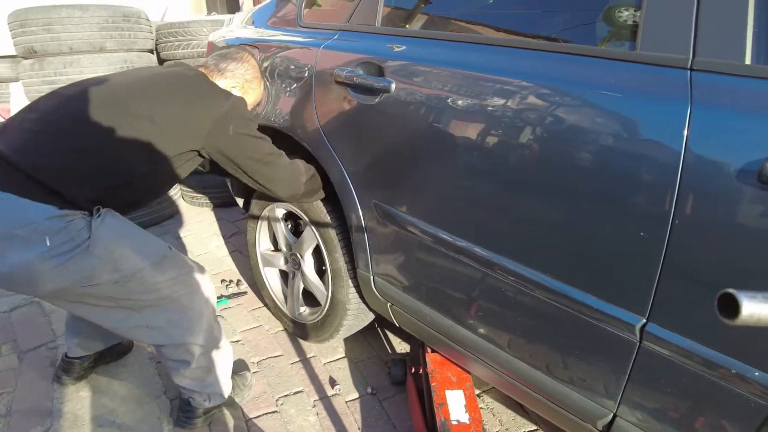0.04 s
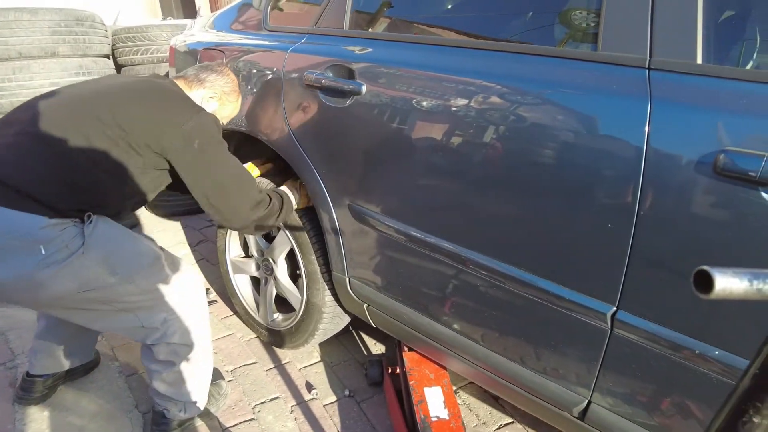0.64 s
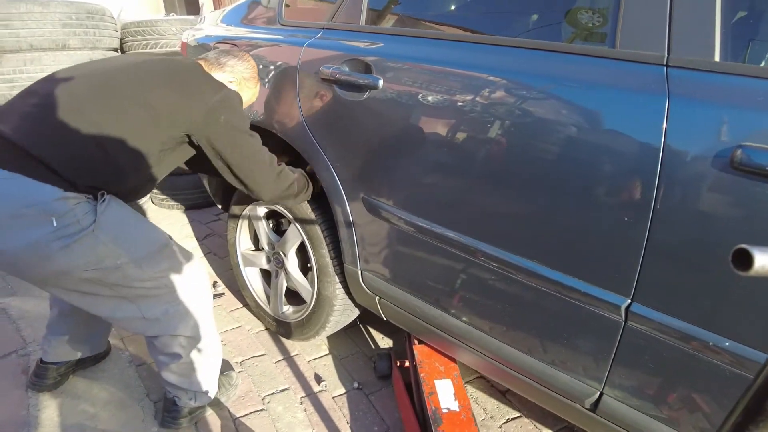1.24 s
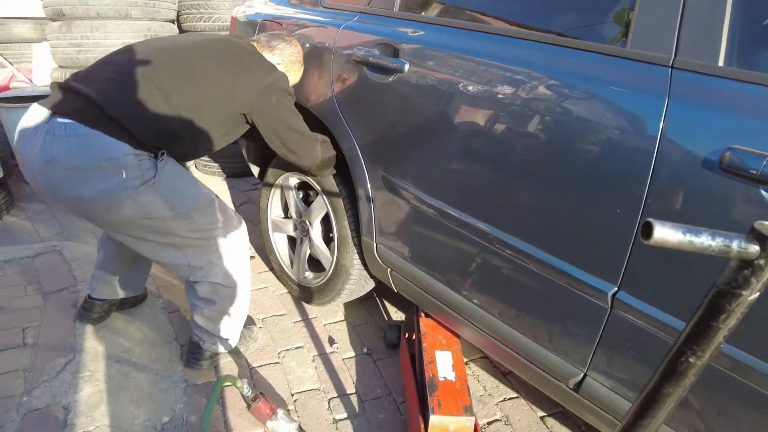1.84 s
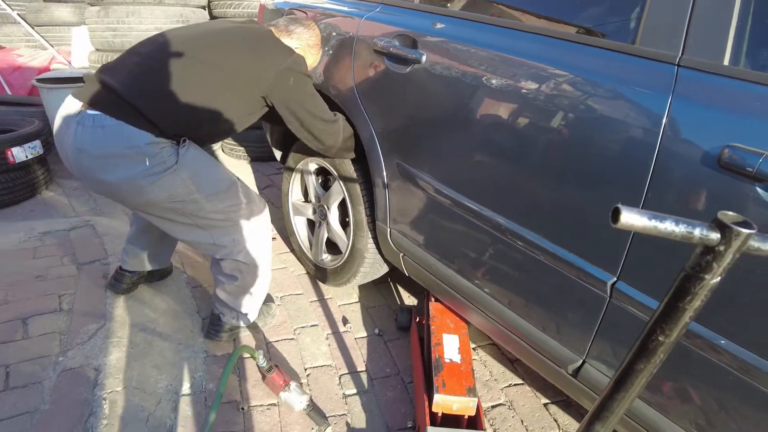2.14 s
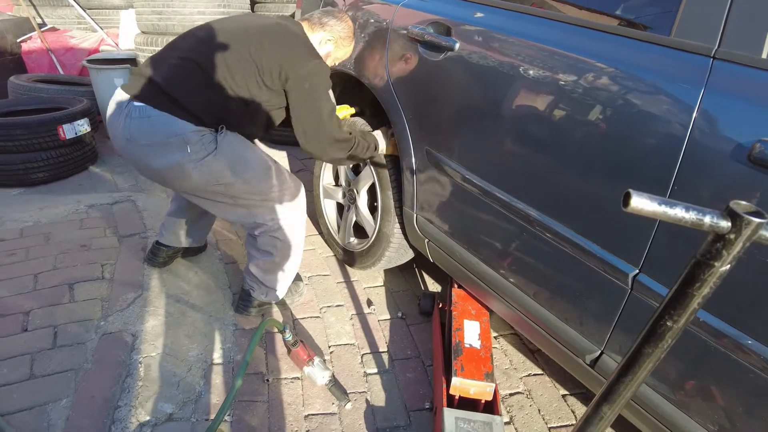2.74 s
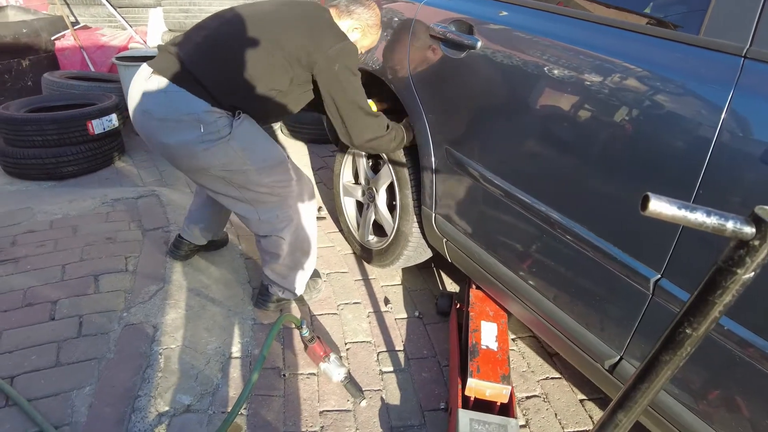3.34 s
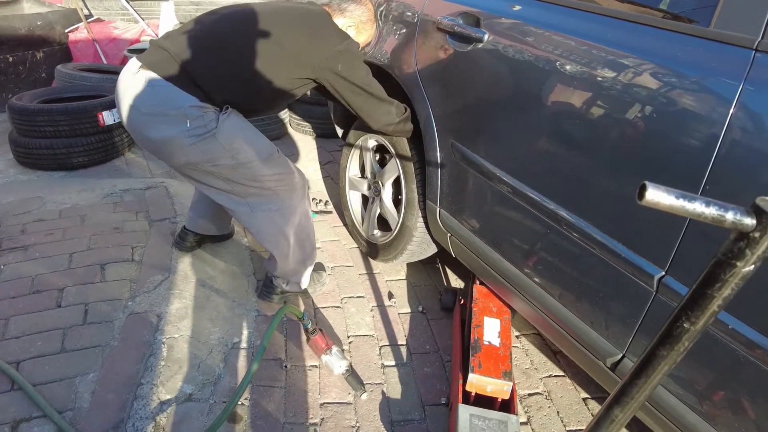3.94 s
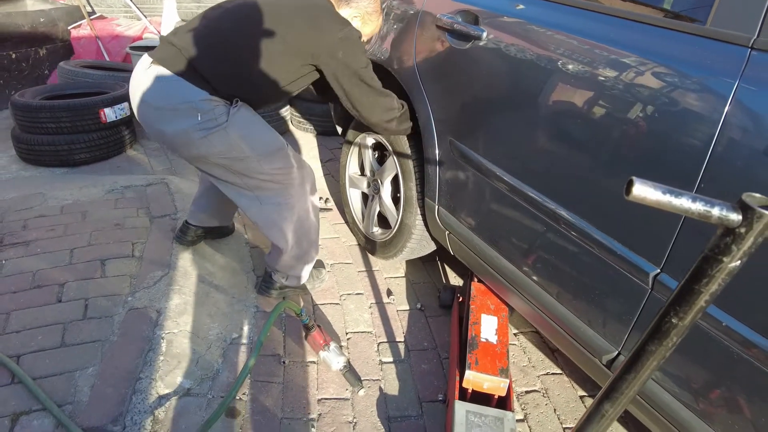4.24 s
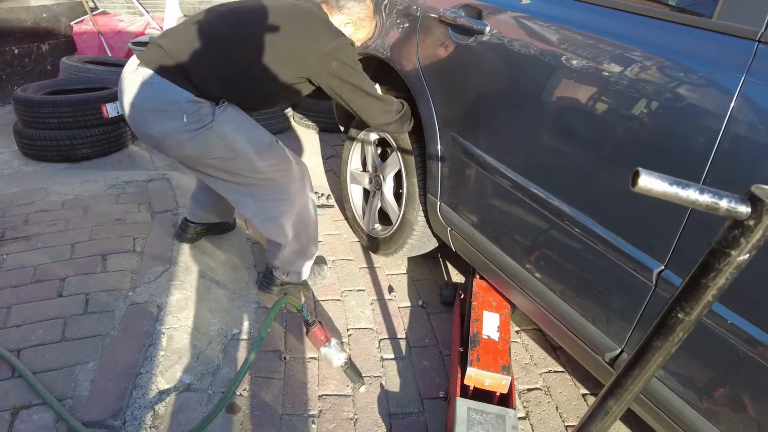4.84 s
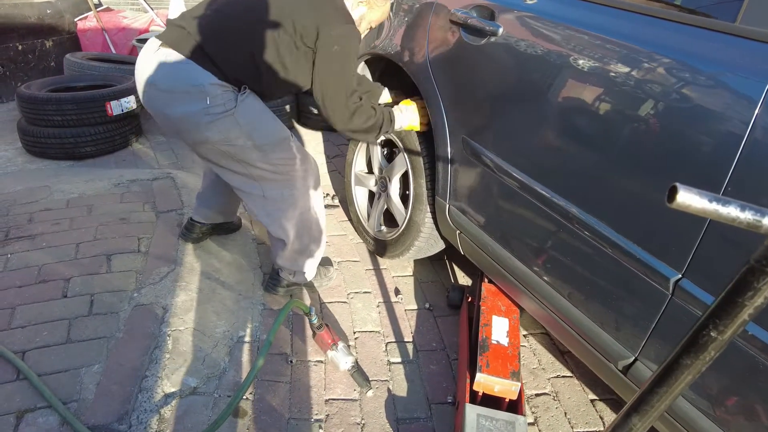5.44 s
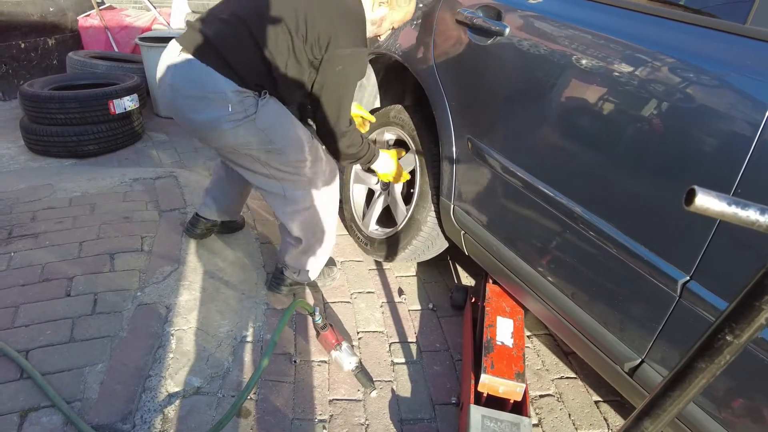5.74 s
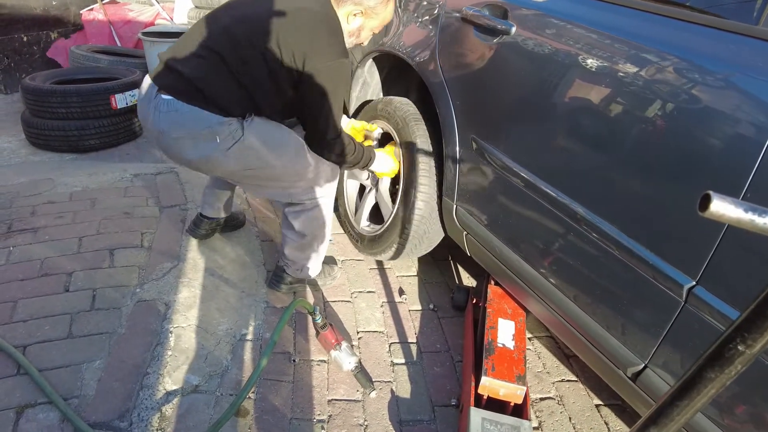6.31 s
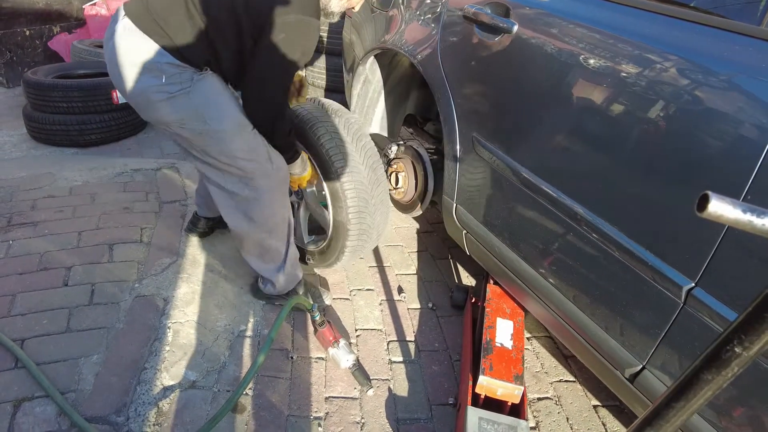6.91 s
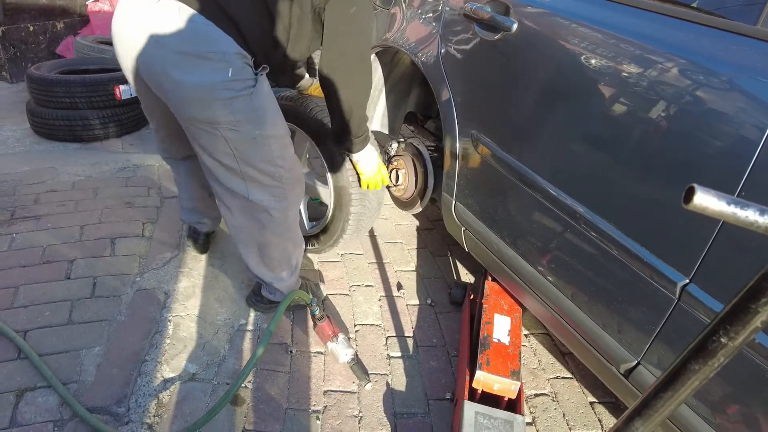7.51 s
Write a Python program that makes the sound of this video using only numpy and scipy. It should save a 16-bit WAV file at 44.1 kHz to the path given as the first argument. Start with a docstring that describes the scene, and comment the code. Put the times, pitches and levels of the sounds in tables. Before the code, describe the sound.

A stuck car wheel is rocked on its hub outdoors, over a faint low wash and soft hiss. From the start, softer dull knocks alternate with hard metallic ones, about half a second apart. The hard knocks, near 0.7, 1.6, 2.7, 3.7 and 4.7 seconds, each come with a short gritty scrape, a rattle and a low tyre thump. From about 2.7 seconds wind rumbles on the microphone, strongest around 4 seconds. The metal gives one faint squeak at 3.3 seconds, and at 3.7 the brake disc rings thin and high. At about 5.1 seconds a quick cluster of knocks and a scrape frees the rim, which rings briefly. The wind dies down by 6 seconds. Faint scuffs and soft tyre bumps follow until about 7.2 seconds as the wheel is lifted away, and a last gust rises near 7.4 seconds.

```python
"""A stuck car wheel is rocked off its hub by hand, on a paved yard with a low wash and a soft hiss.
From the start, pushes and pulls alternate: a push seats the rim with a dull knock; on a pull it
scrapes over the rusty hub, knocks hard and chatters. From about 2.7 s wind rumbles on the microphone.
The loaded metal squeaks once, then a hard scrape sets the brake disc singing. At 5.1 s the rim slips
free and rings. The wind drops, the wheel is lifted away with scuffs and bumps, and a last gust rises."""
import sys
import numpy as np
from scipy import signal
from scipy.fft import rfft, irfft
from scipy.io import wavfile
from scipy.ndimage import uniform_filter1d

SR = 44100
rng = np.random.default_rng(int(sys.argv[2]) if len(sys.argv) > 2 else 0)


def wav_record(signal):
    """Record a signal, one row per channel, as 16-bit PCM in the file named by sys.argv[1]."""
    frames = np.transpose(np.atleast_2d(signal))
    bounded = np.clip(frames, -1, 1)
    # unit amplitude maps onto the largest positive 16-bit level
    quanta = np.round(bounded * 32767).astype(np.int16)
    wavfile.write(sys.argv[1], SR, quanta)


N = 333816
T = np.arange(int(0.8 * SR)) / SR  # time axis of one event [s]


def amp(db):
    """Decibels to gain."""
    return 10 ** (np.asarray(db) / 20)


def at_hz(points, hz):
    """Interpolates (frequency, value) points on a log-frequency axis."""
    freqs, values = np.transpose(points)
    return np.interp(np.log(hz + 1), np.log(freqs + 1), values)


def level_db(curve):
    """Interpolates (time, level) points per sample."""
    return np.interp(np.arange(N) / SR, *np.transpose(curve))


def add(mix, start_s, sound):
    """Mixes a sound in at start_s."""
    part = mix[max(round(start_s * SR), 0):][:len(sound)]
    part += sound[:len(part)]


def colour(x, gain_db):
    """Filters by a dB function of frequency, to rms 1."""
    y = irfft(rfft(x) * amp(gain_db(np.fft.rfftfreq(len(x), 1 / SR))), len(x))
    return y / np.sqrt(np.mean(y ** 2) + 1e-20)


def noise(spectrum, size=len(T)):
    """Noise of rms 1, shaped by (frequency [Hz], level [dB]) points."""
    return colour(rng.standard_normal(size), lambda hz: at_hz(spectrum, hz))


def steadied(x, window_s):
    """Divides out the running rms."""
    return x / np.sqrt(abs(uniform_filter1d(x ** 2, int(window_s * SR))) + 1e-6)


def decayed(x, t60_curve):
    """Decays each band at its own T60."""
    hz, t, bands = signal.stft(x, SR, nperseg=256)
    decay = amp(-60 * t / at_hz(t60_curve, hz)[:, None])
    return signal.istft(bands * decay, SR, nperseg=256)[1][:len(x)]


def ring(modes, scatter_db=0):
    """Decaying sines of a struck body, with optional random mode levels."""
    hz, db, t60_s = np.transpose(modes)[:, :, None]
    gains = amp(db + scatter_db * rng.standard_normal(db.shape))
    return (gains * amp(-60 * T / t60_s) * np.sin(2 * np.pi * hz * T)).sum(0)


def burst(hz, peak_s, shape=2):
    """A few cycles that swell and die."""
    return (T / peak_s * np.exp(1 - T / peak_s)) ** shape * np.sin(2 * np.pi * hz * T)


def rise(rise_s):
    """Exponential attack."""
    return 1 - np.exp(-T / rise_s)


def stroke(length_s, rise_s, fall_s):
    """Pressure of a rub: rise, hold, release."""
    return rise(rise_s) * np.exp(-np.maximum(T - length_s, 0) / fall_s)


def stick_slip(slips_per_s, smooth):
    """Uneven clicks over smooth friction."""
    return rng.standard_normal(len(T)) * (smooth + (rng.random(len(T)) < slips_per_s / SR))


# Ambient spectra (frequency [Hz], relative level [dB])
WASH_SPECTRUM = [(40, 13.5), (100, 5.5), (200, 0), (300, -5.5), (600, -6.5), (1000, -9.5), (1500, -20),
                 (3000, -24.5), (6000, -77.5)]
HISS_SPECTRUM = [(500, 13.5), (1800, 0.5), (3000, 2.5), (5000, 4.5), (7000, 2), (8500, -5.5),
                 (10500, -14.5), (15500, -34)]
# Ambient drift (time [s], relative level [dB])
WASH_DRIFT = [(0.0, -48), (5.6, -48), (6.5, -48), (7.3, -50), (7.57, -51)]
HISS_DRIFT = [(0.0, -62), (0.42, -64), (0.8, -60), (1.33, -62.5), (2.72, -60), (3.79, -62.5), (4.49, -65.5),
              (5.0, -65), (6.22, -64), (7.57, -69.5)]


def air(swell_db=2.5, hiss_gain_db=3.5, self_noise_db=-84.5):
    """Swelling low wash of the surroundings, drifting hiss and microphone self-noise."""
    self_noise = amp(self_noise_db) * noise([(1000, 1), (11000, 0.5), (15500, 1)], N)
    swell = noise([(1, 0), (8, -3), (20, -20), (200, -120)], N)
    wash = amp(level_db(WASH_DRIFT) + swell_db * swell) * noise(WASH_SPECTRUM, N)
    hiss = amp(level_db(HISS_DRIFT) + hiss_gain_db) * noise(HISS_SPECTRUM, N)
    return wash + hiss + self_noise


# Wind strength (time [s], level [dB])
WIND_STRENGTH = [(0.0, -40), (0.46, -47.5), (0.95, -47.5), (1.41, -51.5), (1.56, -49.5), (2.23, -47),
                 (2.62, -40), (2.87, -24.5), (3.08, -25.5), (3.28, -30), (3.4, -24), (3.94, -16),
                 (4.22, -21), (4.62, -25), (4.9, -28), (5.22, -20.5), (5.45, -34), (5.7, -41),
                 (6.07, -59.5), (7.12, -47), (7.57, -34.5)]
# Gusts and lulls (time [s], half length [s], extra push [dB], extra flutter [dB])
GUSTS = [(2.824, 0.046, -8, 7), (2.963, 0.024, 10.5, 3), (3.052, 0.016, 6, 0), (3.29, .04, 6.5, -13),
         (3.359, 0.012, 4, 10), (3.419, 0.026, 10.5, -14), (3.59, 0.034, -4.5, 2), (3.641, 0.054, 10, 6.5),
         (3.772, 0.036, 5, 2), (3.88, 0.023, -2, -3), (3.963, 0.054, 4, 3), (4.03, 0.025, -8, -2.5),
         (4.104, 0.041, 8.5, 8), (4.161, .015, -2, 8), (4.21, 0.021, -1, 10), (4.5, 0.018, 6, 12),
         (4.61, 0.048, -9.5, 0), (4.907, 0.032, 1.5, 0), (5.125, 0.064, 4.5, 9), (5.205, 0.021, 7.5, -2),
         (5.33, 0.032, 9.5, -0.5), (5.405, .03, 4.5, 8), (7.428, 0.057, 10.5, -9)]
# Sudden eddies (time [s], level [dB])
PUFFS = [(3.813, -11), (4.197, -24.5)]
# Wind spectra (frequency [Hz], relative level [dB])
BUFFET_SPECTRUM = [(8, 9.5), (17, 12.5), (28, -3), (45, -10), (80, -17), (140, -36.5), (600, -76),
                   (4000, -110)]
FLUTTER_SPECTRUM = [(30, 11.5), (60, 3.5), (100, -4.5), (135, -5), (185, -11.5), (260, -17), (600, -24.5),
                    (1200, -51.5), (3000, -66.5), (8000, -100)]


def wind(strong_db=-22, lumpiness=0.73, puff_hz=95):
    """Slow eddies push on the microphone, each carrying a flutter; strong wind adds a soft roar."""
    t = np.arange(N) / SR
    excess_db = level_db(WIND_STRENGTH) - strong_db
    push_db, flutter_db = sum(np.outer(extra_db, np.exp(-((t - peak_s) / half_s) ** 2))
                              for peak_s, half_s, *extra_db in GUSTS)
    eddies = steadied(noise(BUFFET_SPECTRUM, N), window_s=0.12)
    flutter = steadied(noise(FLUTTER_SPECTRUM, N) * (1 + lumpiness * eddies ** 2), window_s=0.093)
    roar = noise(WASH_SPECTRUM, N)
    out = amp(-18.5 + 0.99 * (excess_db + push_db)) * eddies
    out += amp(-31.5 + excess_db + flutter_db) * flutter
    out += amp(-42.5 + 0.76 * excess_db) * roar
    for start_s, db in PUFFS:
        add(out, start_s, amp(db) * burst(puff_hz, peak_s=0.0036))
    return out


# Reflections off paving, door and wheel arch (delay [s], gain [ratio])
ECHOES = [(.0033, 0.18), (0.02, 0.096), (.028, 0.13)]
# Tail decay (frequency [Hz], T60 [s])
YARD_T60 = [(150, 0.63), (700, 0.33), (2000, 0.37), (8000, 0.17)]


def yard(x, tail_db=-21, build_s=0.031):
    """Near reflections, then a thin tail from the walls."""
    out = x.copy()
    for delay_s, gain in ECHOES:
        add(out, delay_s, gain * x)
    tail = decayed(rng.standard_normal(len(T)), YARD_T60) * rise(build_s)
    return out + amp(tail_db) * signal.oaconvolve(x, tail / np.linalg.norm(tail))[:N]


def rub(length_s, centre_hz, skirt_db_per_oct):
    """Light stick-slip friction in one band, shelved down above 9 kHz."""
    def gain_db(hz):
        shelf_db = -28 / (1 + (9000 / (hz + 1)) ** 8)
        return shelf_db - skirt_db_per_oct * abs(np.log2((hz + 1) / centre_hz))

    friction = colour(stick_slip(slips_per_s=1000, smooth=0.17), gain_db)
    return friction * stroke(length_s, rise_s=0.0028, fall_s=0.0062)


# Rubs (time [s], length [s], level [dB], centre [Hz], skirt [dB/octave])
SCUFFS = [(0.169, 0.01, -53, 5000, 1), (0.531, 0.017, -54, 1980, 3), (0.898, 0.034, -57.5, 1960, 26),
          (1.849, 0.047, -55.5, 1320, 15), (2.536, 0.015, -48.5, 5100, 6), (3.507, 0.054, -59, 4560, 2),
          (4.255, 0.032, -60.5, 2480, 10), (4.949, 0.068, -62, 5360, 1), (5.037, 0.014, -44, 615, 21),
          (6.159, 0.016, -52, 2560, 2), (6.249, 0.034, -63.5, 4600, 3), (6.273, 0.044, -57, 600, 8),
          (6.461, 0.015, -55.5, 6700, 4), (6.468, 0.056, -58.5, 586, 8), (6.572, 0.041, -60, 1410, 7),
          (6.7, 0.027, -53.5, 540, 26), (7.042, 0.048, -63, 2560, 18), (7.197, 0.012, -53.5, 4320, 1),
          (7.222, 0.0028, -49.5, 4150, 0)]
# Tyre bumps (time [s], level [dB])
BUMPS = [(1.612, -32.5), (5.878, -46), (6.614, -45.5), (6.706, -52), (6.846, -44), (7.015, -48)]


def handling():
    """Gloves, shoes and tyre scuff; the tyre bumps softly."""
    out = np.zeros(N)
    for start_s, length_s, db, centre_hz, skirt_db_per_oct in SCUFFS:
        add(out, start_s, amp(db) * rub(length_s, centre_hz, skirt_db_per_oct))
    for start_s, db in BUMPS:
        body = noise([(60, 6), (400, 6.5), (800, 2), (1500, -18.5), (6000, -38), (12000, -47)])
        add(out, start_s, amp(db) * body * stroke(0.0036, rise_s=0.00029, fall_s=0.0075))
    return out


# Squeak partials (frequency [Hz], relative level [dB])
SQUEAK_PARTIALS = [(1380, -2), (1720, -3), (2780, -8)]


def squeak(start_s=3.29, length_s=0.087, db=-57, waver=0.015):
    """Loaded metal squeaks once, its pitch wavering."""
    warped_s = np.cumsum(1 + waver * noise([(10, 4), (60, -19), (300, -58)])) / SR
    tone = sum(amp(partial_db) * np.sin(2 * np.pi * hz * warped_s) for hz, partial_db in SQUEAK_PARTIALS)
    out = np.zeros(N)
    add(out, start_s, amp(db) * tone * stroke(length_s, rise_s=0.0068, fall_s=0.028))
    return out


# Rim slides (time [s], length [s], level [dB], tilt [dB/octave])
SCRAPES = [(0.646, 0.0033, -40, 7), (0.653, 0.019, -41, 4), (1.591, 0.0038, -42, 4), (1.601, 0.014, -47, 7),
           (2.709, 0.016, -35, 3.5), (3.708, 0.015, -45, 5.5), (3.731, 0.0069, -33, 5),
           (4.644, 0.016, -43, 4), (4.663, 0.014, -33, 0), (4.98, 0.0042, -41.5, 2),
           (5.06, 0.016, -39, 1.5), (5.1207, 0.0085, -23, -2.5), (5.19, 0.053, -63, 11)]
# Friction spectrum before tilt (frequency [Hz], relative level [dB])
SCRAPE_SPECTRUM = [(200, 12), (700, 21), (1300, 13.5), (2000, 10.5), (3300, 2.5), (5000, 1.5), (7300, -7.5),
                   (8600, -14.5), (15000, -42)]
# Brake disc modes (frequency [Hz], relative level [dB], T60 [s])
DISC_MODES = [(4430, -4, 0.42), (5930, -6, 0.5), (6300, 0, 0.45), (6310, -6.5, 0.35), (6900, -3, 0.45),
              (7090, -14, 0.45)]


def scrapes(disc_s=3.73, disc_db=-54):
    """The rim grates over the rusty hub; one hard scrape sets the brake disc singing."""
    out = np.zeros(N)
    for start_s, length_s, db, tilt_db_per_oct in SCRAPES:
        grating = colour(
            stick_slip(slips_per_s=2500, smooth=0.3),
            lambda hz: at_hz(SCRAPE_SPECTRUM, hz) + tilt_db_per_oct * np.log2((hz + 300) / 3000))
        add(out, start_s, amp(db) * grating * stroke(length_s, rise_s=0.0016, fall_s=0.006))
    add(out, disc_s, amp(disc_db) * ring(DISC_MODES))
    return out


# Sudden slips (time [s], snap level [dB], chink level [dB])
SNAPS = [(0.678, -40, -43), (1.6245, -39, -49), (2.7098, -36.5, -50), (2.7168, -29.5, -39),
         (3.716, -42, -48), (3.7292, -31, -42), (4.649, -41, -40), (4.665, -60, -38), (4.6855, -43, -42),
         (5.0625, -41, -52), (5.1182, -40, -43)]
# Spectra of the snap and of the disc's close high modes (frequency [Hz], relative level [dB])
SNAP_SPECTRUM = [(500, 12.5), (2000, 10.5), (4500, -1.5), (8500, -2.5), (10500, -7.5), (15500, -19)]
CHINK_SPECTRUM = [(3000, -26), (5300, -13), (6100, 7.5), (7600, 6.5), (8600, -30), (14000, -41)]


def snaps(snap_decay_s=0.003):
    """The rim jumps off ridges of rust: a dry snap and a bright chink of the brake disc."""
    out = np.zeros(N)
    for start_s, snap_db, chink_db in SNAPS:
        snap = amp(snap_db) * noise(SNAP_SPECTRUM) * np.exp(-T / snap_decay_s)
        chink = amp(chink_db) * noise(CHINK_SPECTRUM) * stroke(0, rise_s=0.0005, fall_s=0.008)
        add(out, start_s, snap + chink)
    return out


# Modes of the freed rim (frequency [Hz], relative level [dB], T60 [s])
FREE_RIM_MODES = [(856, -1.5, 0.39), (914, -5, 0.52)]


def release(start_s=5.145, db=-39):
    """The rim rings on as it slips off the hub."""
    out = np.zeros(N)
    add(out, start_s, amp(db) * ring(FREE_RIM_MODES) * rise(0.012))
    return out


# Tyre and suspension (frequency [Hz], relative level [dB])
THUMP_SPECTRUM = [(30, -29), (65, 9), (125, -1.5), (190, 0), (260, -6), (370, -8.5), (700, -27.5),
                  (2000, -62), (8000, -110)]
# Their decay (frequency [Hz], T60 [s])
THUMP_T60 = [(60, 0.39), (200, 0.38), (700, 0.2)]


def tyre_thump(excess_db):
    """A blow shakes tyre and suspension, more with more force."""
    body = steadied(noise(THUMP_SPECTRUM), window_s=0.017)
    return amp(-27.5 + 0.76 * excess_db) * decayed(body, THUMP_T60) * rise(0.0024)


# Dense rim and brake modes (frequency [Hz], relative level [dB])
CLATTER_SPECTRUM = [(150, 7), (260, -9), (330, 4), (480, 6.5), (620, 4.5), (800, -3.5), (1000, 2.5),
                    (1400, -17), (1950, -5), (2700, -14.5), (3300, -11.5), (7200, -25), (9000, -30),
                    (15000, -60.5)]
# Their decay (frequency [Hz], T60 [s])
CLATTER_T60 = [(200, 0.2), (700, 0.16), (2000, 0.1), (7000, 0.13), (12000, 0.045)]


def clatter(excess_db, corner_hz=2950, crack=0.15, crack_s=0.001):
    """Rim and brake rattle; a softer contact leaves less above the corner frequency."""
    dense = steadied(noise(CLATTER_SPECTRUM), window_s=0.0063)
    attack = (1 + crack * np.exp(-T / crack_s)) * rise(0.0007)
    rattle = decayed(dense, CLATTER_T60) * attack
    low = signal.sosfilt(signal.ellip(6, 1, 50, corner_hz, fs=SR, output="sos"), rattle)
    high = signal.sosfilt(signal.butter(6, corner_hz, "high", fs=SR, output="sos"), rattle)
    return low + amp(-5.5 + 0.55 * excess_db) * high


# Lingering modes of the loose wheel (frequency [Hz], relative level [dB], T60 [s])
HUM_MODES = [(192.5, -3, 0.5), (225.5, -12, 0.35), (339, -12, 0.3), (549.7, 4.5, 0.54), (629, -13, 0.29),
             (674, -8, 0.24), (893, -21, 0.3)]


def wheel_hum(depth=0.14, rise_s=0.018):
    """A few modes linger and waver as the loose wheel wobbles."""
    wobble = 1 + depth * noise([(6, -4), (14, 7.5), (40, 3), (90, -23.5), (400, -60), (2000, -120)])
    swell = 1 - np.exp(-(T / rise_s) ** 2)
    return ring(HUM_MODES, scatter_db=1) * wobble * swell


# Short, hard modes of the alloy rim (frequency [Hz], relative level [dB], T60 [s])
RIM_MODES = [(1682, -4.5, 0.098), (1980, -18, 0.033), (2205, -15, 0.079), (2579, -10, 0.096),
             (2710, -9, 0.04), (3360, -29.5, 0.098)]


def rim_clack(hz):
    """The rim lands on the hub: a few bright cycles plus its own modes."""
    return burst(hz, peak_s=0.0019, shape=0.73) + ring(RIM_MODES, scatter_db=1.5)


def rim_chatter(bounces=3, gap_s=0.01, first_db=-6.5, loss_db=8.5):
    """After a hard pull the rim bounces on the hub, dying away."""
    out = np.zeros(len(T))
    delays_s = np.cumsum(gap_s * rng.uniform(0.5, 1.5, bounces))
    for k, delay_s in enumerate(delays_s):
        add(out, delay_s, amp(first_db - k * loss_db) * ring(RIM_MODES, scatter_db=5.5))
    return out


def rim_settle(rub_delay_s=0.023, click_delay_s=0.056):
    """After a soft blow the rim rebounds with a rub, rocks back and clicks."""
    out = np.zeros(len(T))
    add(out, rub_delay_s, amp(-12) * rub(length_s=0.011, centre_hz=1980, skirt_db_per_oct=16))
    add(out, click_delay_s, amp(-11.5) * burst(hz=1900, peak_s=0.0019, shape=0.65))
    return out


# Wheel and hub modes (frequency [Hz], relative level [dB], T60 [s])
WHEEL_MODES = [(123.8, -5.5, 0.27), (182.4, -19.5, 0.42), (329, -14.5, 0.097), (543, -16, 0.48),
               (589.3, 1, 0.14), (625, -11, 0.29), (640, -16, 0.032), (710, -14.5, 0.31),
               (813, -21.5, 0.086), (912, -21.5, 0.29), (1020, -14, 0.091), (1090, -23, 0.039),
               (1620, -26, 0.069), (1940, -33, 0.23)]
# Rim against hub, pulls hard, pushes soft (time [s], force [dB], ring level [dB], clonk level [dB],
# clonk pitch [Hz], clack level [dB], clack pitch [Hz], hum level [dB])
KNOCKS = [(0.1409, -30, -44, -26, 548, -41.5, 2630, -46),
          (0.6773, -21.5, -22, -17.5, 643, -37, 1980, -32.5), (1.064, -30, -36, -21, 593, -36.5, 2490, -52),
          (1.6238, -23, -21.5, -17, 650, -35.5, 1850, -34.5),
          (2.1156, -32.5, -24.5, -25.5, 750, -44, 2660, -52), (2.7321, -25, -26, -32, 636, -38, 2560, -33),
          (3.14, -30, -27, -31.5, 930, -36.5, 2680, -47), (3.745, -23.5, -24, -26, 647, -40.5, 2660, -35),
          (4.1274, -29, -21.5, -28, 730, -45, 2160, -45), (4.6840, -22, -29, -18.5, 651, -32, 2660, -35.5),
          (5.063, -43, -19.5, -19.5, 729, -41, 2230, -39), (5.123, -23, -25, -35, 620, -37, 2500, -29.5),
          (5.142, -25.5, -50, -18.5, 860, -35, 1850, -32.5)]


def knocks(full_pull_db=-23, soft_below_db=-28):
    """Each blow clonks and clacks, rings the wheel, rattles rim and brake, and shakes the tyre."""
    out = np.zeros(N)
    for start_s, force_db, ring_db, clonk_db, clonk_hz, clack_db, clack_hz, hum_db in KNOCKS:
        excess_db = force_db - full_pull_db
        # Contact pitches depend on where the rim is held and where it lands.
        clonk = amp(clonk_db) * burst(clonk_hz, peak_s=0.0053)
        rebound = rim_settle() if force_db < soft_below_db else rim_chatter()
        clack = amp(clack_db) * (rim_clack(clack_hz) + rebound)
        tone = amp(ring_db) * ring(WHEEL_MODES, scatter_db=1.5) * rise(0.0014)
        hum = amp(hum_db) * wheel_hum()
        rattle = amp(force_db) * clatter(excess_db)
        add(out, start_s, clonk + clack + tone + hum + rattle + tyre_thump(excess_db))
    return out


def scene():
    """Air, wind and the wheel in the yard; mono."""
    wheel = handling() + squeak() + scrapes() + snaps() + release() + knocks()
    return (air() + wind() + yard(wheel))[None]


def record(dry, ceiling=0.8, cutoff_hz=15750):
    """The microphone soft-clips the strongest gusts; a low-pass limits the band."""
    rounded = dry / (1 + (dry / ceiling) ** 4) ** (1 / 4)
    lowpass = signal.firwin(511, cutoff_hz, window=("kaiser", 9), fs=SR)
    return signal.oaconvolve(rounded, lowpass[None], "same")


dry = scene()
out = record(dry)
wav_record(out)
```